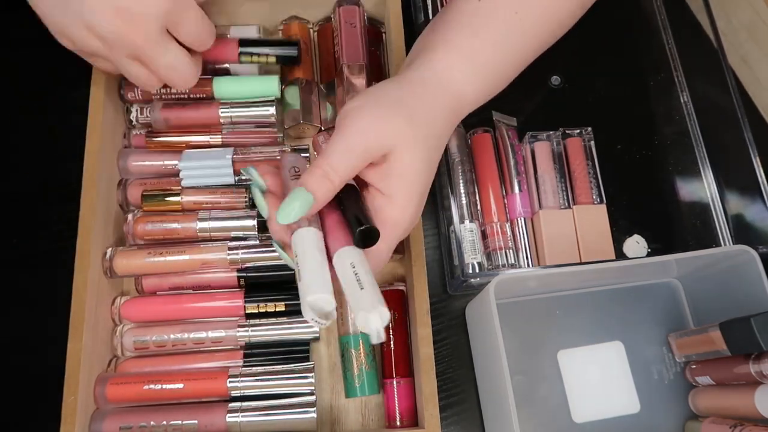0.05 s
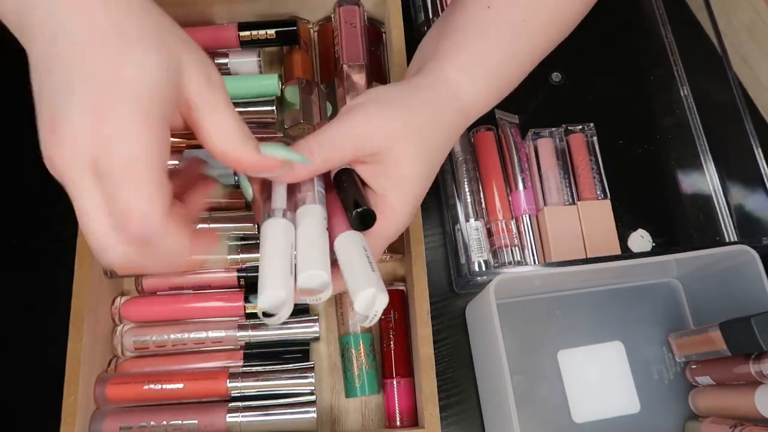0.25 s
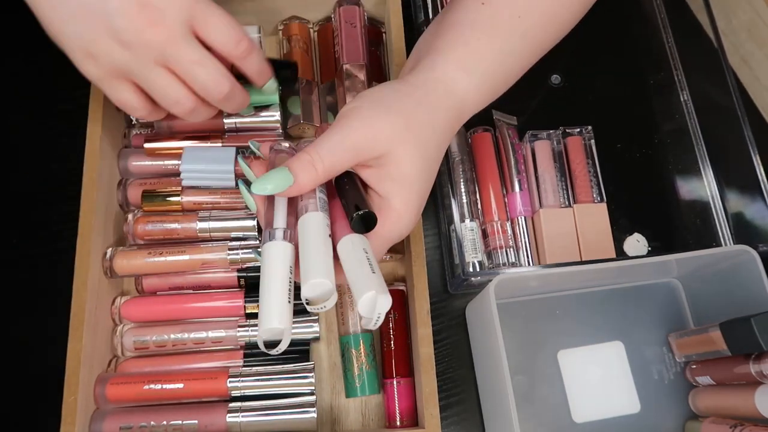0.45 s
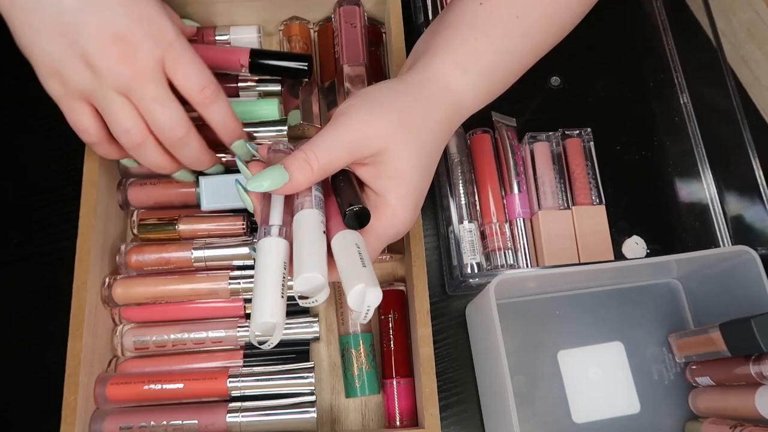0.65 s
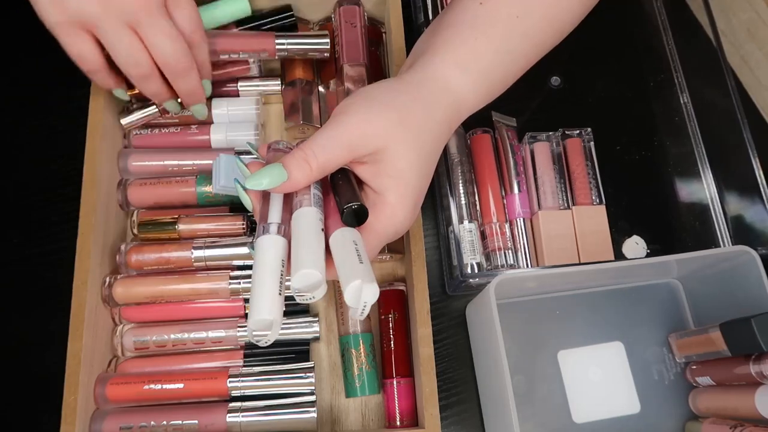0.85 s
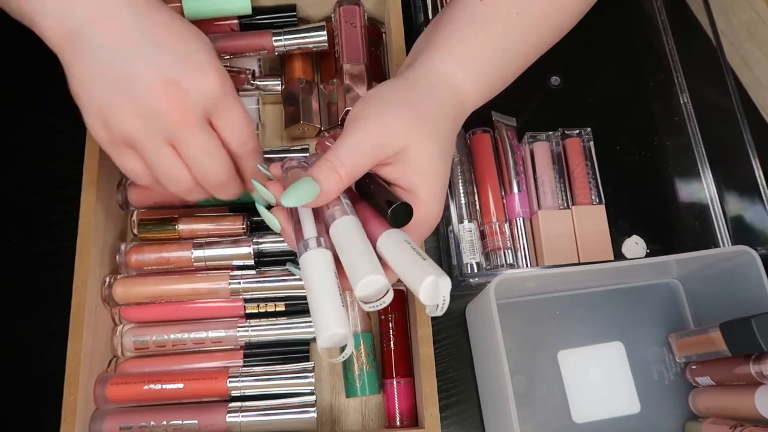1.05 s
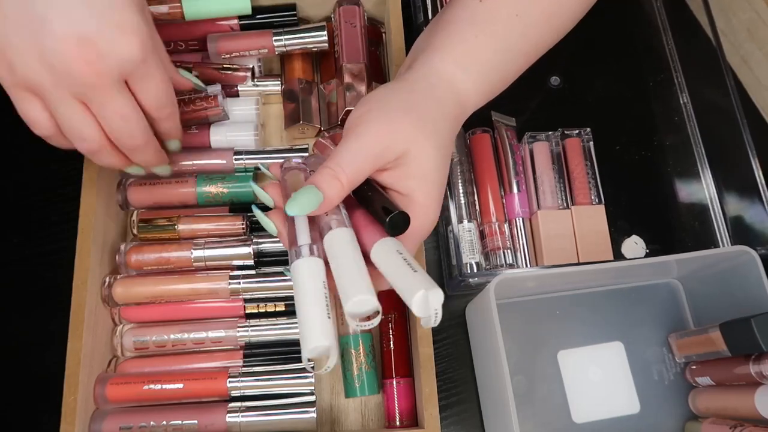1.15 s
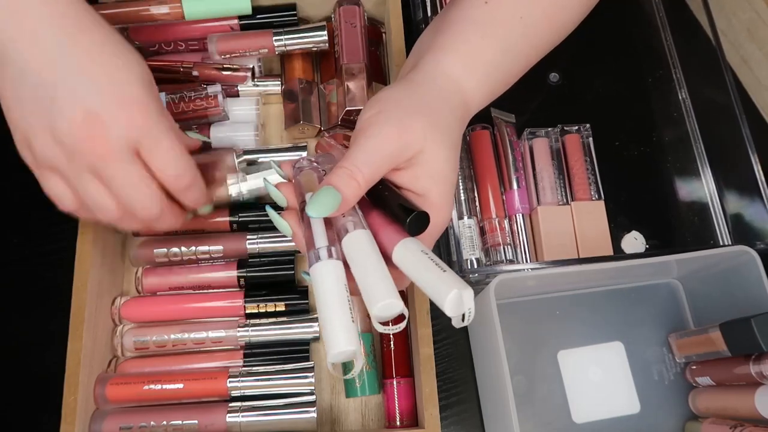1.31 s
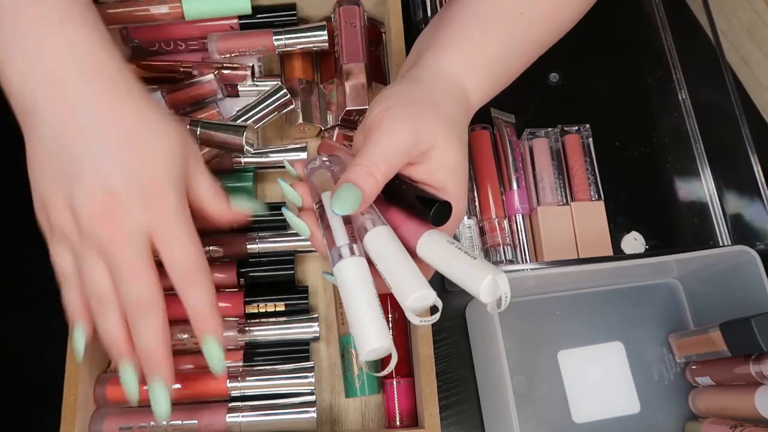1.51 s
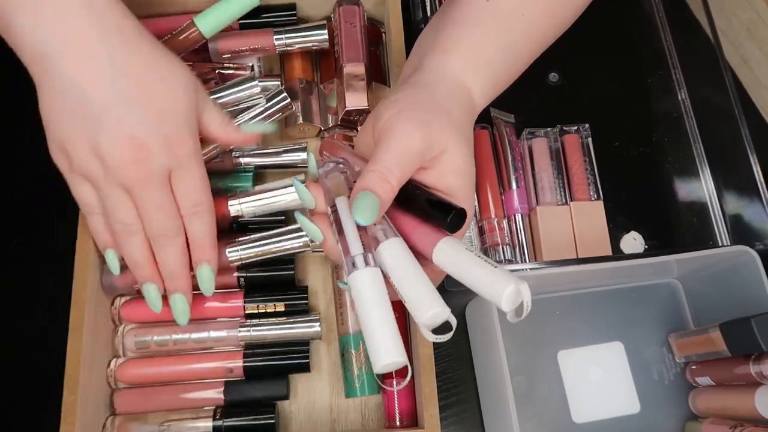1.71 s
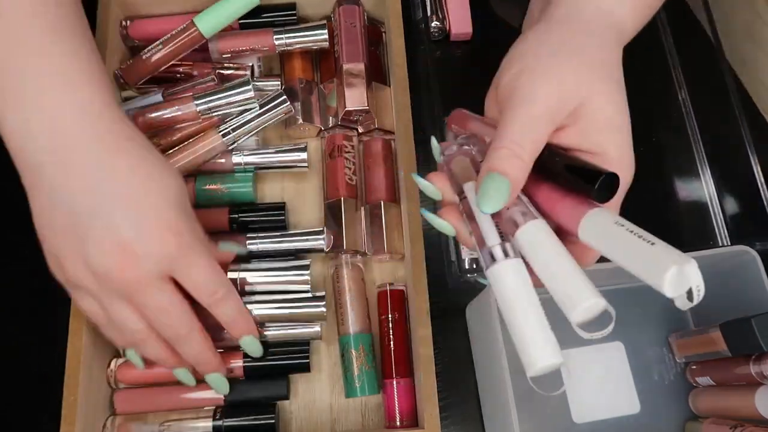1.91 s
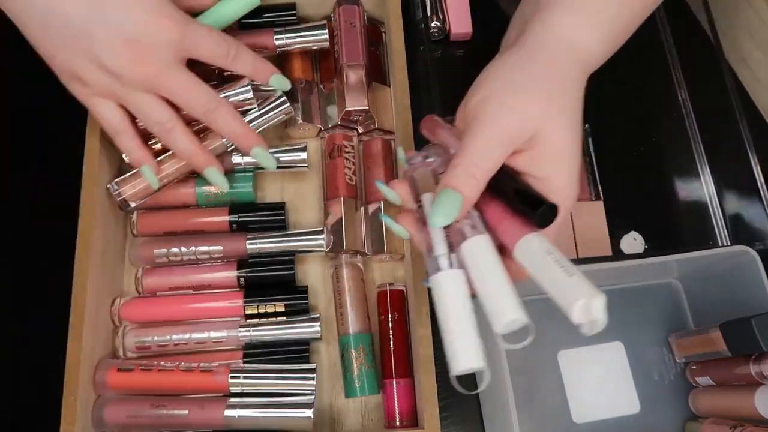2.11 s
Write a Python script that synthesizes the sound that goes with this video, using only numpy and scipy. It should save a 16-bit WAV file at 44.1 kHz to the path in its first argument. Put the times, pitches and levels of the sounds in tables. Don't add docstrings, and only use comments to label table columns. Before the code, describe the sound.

Hard plastic tubes click and clatter as hands rummage in a wooden drawer, heard close in mono. Lighter, scattered clicks come first, thickening from 0.55 to 0.9 seconds. After a lull come strong clacks around 1.1 and 1.3, dense rattling at 1.55-1.7 and 1.82-2.0, then a few softer clicks near 2.15. Faint rustling, short room reflections and a steady low hum lie underneath.

```python
import sys
import numpy as np
from scipy import signal
from scipy.fft import rfft, irfft
from scipy.io import wavfile
from scipy.ndimage import uniform_filter1d

SR = 44100
rng = np.random.default_rng(int(sys.argv[2]) if len(sys.argv) > 2 else 0)


def boost(x):
    u = np.asarray(x, float) / 20
    return 10 ** u


def inscribe(sig):
    pcm = np.round(np.clip(np.atleast_2d(sig).T, -1, 1) * 32767)
    wavfile.write(sys.argv[1], SR, pcm.astype(np.int16))


N = 95608

CLACK_TIME = np.arange(1200) / SR
CAP_LOW_HZ = 8000


def unit(x):
    return x / np.sqrt(np.mean(x ** 2))


def band(x, low_hz, high_hz):
    return signal.sosfilt(signal.butter(2, [low_hz, high_hz], "band", fs=SR, output="sos"), x)


def ring(mode_hz, mode_db, t60_s):
    modes = boost(mode_db)[:, None] * np.sin(2 * np.pi * mode_hz[:, None] * CLACK_TIME)
    x = modes.sum(0) * 1000. ** (-CLACK_TIME / t60_s)
    return x / np.sqrt(np.mean(x[:176] ** 2))


def tubes():
    # (time [s], tube level [dB], board level re tube [dB], cap level re tube [dB],
    # pitch [Hz])
    main_impacts = [(0.0296, -34.5, -5, 0, 5980), (0.041, -24.5, -3.5, -3.5, 4500),
                    (0.1063, -29.5, -2, -9, 4440), (0.1503, -33, -21, 8.5, 5280),
                    (0.2039, -54, -12, 11.5, 14130), (0.226, -38, -7.5, -12, 3970),
                    (0.278, -41, -5.5, -12, 3940), (0.333, -46, -3, -1, 13670), (0.3389, -39.5, -25, 2.5, 1960),
                    (0.403, -34.5, 2.5, -6.5, 3380), (0.4349, -32, 2.5, -1, 4330), (0.4446, -36, 0, 0, 8940),
                    (0.4594, -31, -6, -1, 11400), (0.4644, -30.5, -1, 0, 4020), (0.483, -34, -2.5, -12, 5340),
                    (0.5411, -30.5, 0, -2.5, 4500), (0.5513, -27.5, 1, -12, 5200), (0.5877, -34, -14, -11, 6080),
                    (0.5948, -19.5, 0, 3.5, 12100), (0.6398, -33, 9, -7, 5460), (0.6589, -24, 2, -3.5, 4030),
                    (0.6733, -30, 7.5, -13, 3400),
                    (0.7082, -23, 0, -4, 5320), (0.7214, -23.5, 3, 3, 13480), (0.7277, -17, -8.5, -5.5, 5190),
               (0.7502, -25, 0.5, 0.5, 6860), (0.7676, -31.5, 4.5, 1, 5360), (0.7762, -20, -7, -5, 4020),
               (0.8126, -18, -4, -1.5, 4580), (0.826, -20, -7, -23, 7060), (0.839, -17.5, -4.5, -5, 6950),
               (0.863, -27, -10, -7, 4530), (0.882, -25, -2, -18, 5500), (0.8889, -19.5, -9.5, -3, 4100),
               (0.9469, -33.5, -3.5, -13, 5160), (0.968, -38.5, 11.5, -2, 4120),
               (0.9814, -40.5, 11.5, -1, 4460), (1.0077, -37.5, -2, 3.5, 14400),
               (1.047, -27.5, 1, -2.5, 4250), (1.1006, -22, -3, -7, 5340), (1.1085, -22.5, 0, -6.5, 6600),
               (1.1138, -18, -7.5, -8.5, 4520), (1.203, -52, 11, 7, 14400),
                    (1.2305, -30, -2, -5, 3570), (1.2588, -22, -5, -17, 4200), (1.2694, -22.5, -1.5, 0.5, 4000),
                (1.2939, -13.5, 1.5, -27, 4420), (1.298, -20.5, -24, 2, 4400),
                (1.308, -13.5, -4, -6.5, 4150), (1.3902, -36.5, 3.5, 1.5, 4090), (1.4445, -40, 0, -5, 5570),
                (1.5352, -32, -0.5, -5.5, 3380), (1.563, -18.5, -6.5, -13, 5010),
                (1.5764, -16.5, -1, 1, 9500), (1.5853, -18, -2.5, -8, 5400), (1.6079, -18.5, -6, -1, 5000),
                (1.6296, -19, -8.5, 1, 5680), (1.6403, -22.5, 4.5, -7, 5920), (1.6464, -18, -2, -8, 5020),
                (1.6566, -18.5, -12, -2, 12600), (1.6612, -15, -7, -4, 6140),
                (1.6666, -15.5, -3, -13.5, 4260), (1.676, -26, -17, -10, 7060),
                (1.6898, -15.5, -7, -3.5, 4110), (1.7022, -24.5, -6.5, -22, 6590),
                    (1.7308, -28.5, -5.5, -9.5, 5280), (1.8214, -33.5, 1, -17, 3640),
               (1.8315, -23, -7, -18, 3800), (1.8439, -22, -3.5, -16, 6160), (1.8543, -18, -7, -0.5, 4100),
               (1.8745, -19, -3.5, 0, 4940), (1.8934, -25, -15, -2, 7800), (1.9019, -25, -5, -2, 8660),
               (1.9175, -20, 2.5, -0.5, 4070), (1.952, -27, 4.5, 6, 10800),
               (1.9552, -18.5, -1, -2.5, 14400), (1.9739, -25, -1, -6, 5640), (1.9792, -22, -4, -5, 4520),
               (1.985, -17.5, -5.5, -9.5, 5520), (1.9929, -16.5, -5, -9, 4990), (2.007, -23, -7, -12, 4730),
               (2.1135, -35.5, -11, -12, 6870), (2.1559, -31.5, -10, -11, 3350),
               (2.1598, -25, -4.5, -8, 5100), (2.166, -34, -6, 4, 13500)]
    # (time [s], tube level [dB], board level re tube [dB], cap level re tube
    # [dB], pitch [Hz])
    soft_impacts = [(0.011, -35, -5, -10, 5240), (0.0509, -28, 0, -9, 4440), (0.18, -49.5, -19, 4, 13470),
                    (0.3183, -51, -13, -17, 4350), (0.384, -41.5, 0, -0.5, 4300), (0.3921, -49, 7, -7, 3330),
                    (0.4093, -35.5, 0, -5, 3350), (0.5088, -51, 3, -9, 4350), (0.5228, -41, 0, -4, 4150),
                    (0.535, -35.5, 2.5, -10, 4970), (0.5605, -28, -1, -6, 4440), (0.5658, -38, -1, 5, 3000),
                    (0.5745, -45, 1, -1, 4270), (0.5851, -25.5, -6, -19, 4200), (0.632, -34, -9, -5, 5200),
                    (0.6642, -19, -12, -4, 4300), (0.7142, -30.5, 8.5, 3, 3840), (0.7299, -19.5, -4, -3, 5340),
                    (0.816, -21.5, 0, -18, 4380), (1.0257, -41, -1, -2, 4200), (1.0837, -52, 5, -17, 3280),
                    (1.1648, -45, -3, -15, 4000),
                    (1.328, -25.5, -22, -3.5, 5100), (1.3424, -32.5, -14, -2, 4260),
                (1.3535, -32, -2, -17, 5700), (1.3713, -34.5, -5, -16, 4500), (1.4027, -32, 0.5, -5, 4500),
                (1.4112, -38, -1, -1, 3450), (1.4681, -46.5, 6.5, -16, 3490),
                (1.4817, -49.5, 3.5, -17, 3980), (1.5129, -60, 13, -15, 3660), (1.5321, -35, -12, -2, 3100),
                (1.5486, -30, -1, -11, 4860), (1.5967, -34, -15, -1, 5200), (1.6097, -19, -2, 2.5, 5440),
                (1.6475, -21, 3.5, 5.5, 2970), (1.7268, -39, 0, -14, 6140), (1.7926, -47.5, 3, -20, 3480),
                (1.9087, -34, -8, -3, 5700), (1.923, -25.5, -7, 2.5, 3980), (2.0176, -32.5, 1.5, -2, 3950),
                (2.0277, -31, 3, -11, 4760), (2.1312, -36.5, -3, -9, 4930), (2.1422, -40, -4, -1, 4700),
                (2.1507, -42, -1, 9.5, 3450)]
    out = np.zeros(N + SR)
    for time_s, *impact in main_impacts + soft_impacts:
        sound, start = clack(*impact), int(time_s * SR)
        out[start:start + len(sound)] += sound
    return out[:N]


def clack(tube_db, board_db, cap_db, pitch_hz):
    # (frequency [Hz], level [dB])
    drawer_modes = [(450, -14.5), (880, -16.5), (1040, -2), (1330, 1), (1570, 3.5), (1900, -1), (2300, 1.5)]
    u = rng.random((3, 8))
    g = rng.standard_normal((2, 8))
    hiss = rng.standard_normal((2, len(CLACK_TIME)))

    board_hz, board_mode_db = np.transpose(drawer_modes)
    board = ring(board_hz * (1 + 0.045 * g[1, :7]), board_mode_db + 5 * g[0, 1:], t60_s=0.025)

    centre_hz, spread = np.clip(pitch_hz, 3700, 6300), 1.42
    tube_hz = centre_hz * spread ** (2 * u[0] - 1)
    cap_hz = CAP_LOW_HZ * 1.9 ** u[1]
    side_db = -11 + 4 * g[1]
    tube_mode_db, cap_mode_db = side_db, side_db
    if pitch_hz > CAP_LOW_HZ:
        cap_hz, cap_mode_db = np.r_[pitch_hz, cap_hz], np.r_[0, side_db]
    else:
        tube_hz, tube_mode_db = np.r_[pitch_hz, tube_hz], np.r_[0, side_db]
    tube = ring(tube_hz, tube_mode_db, t60_s=0.016)
    cap = ring(cap_hz, cap_mode_db, t60_s=0.0056)

    crack = contact_noise(u[2], g[1], hiss)
    parts = [(board_db - 2.5, board, 900, 2800),
             (tube_db * 0 - 1, tube, centre_hz / spread, centre_hz * spread),
             (cap_db + 0.5, cap, CAP_LOW_HZ, 13500)]
    body = 0
    for level_db, modes, low_hz, high_hz in parts:
        noise = band(crack, low_hz, high_hz) * np.sqrt(SR / 2 / (high_hz - low_hz))
        body = body + boost(level_db) * (modes + noise)
    contact_s = 0.0001
    return boost(tube_db) * body * np.minimum(CLACK_TIME / contact_s, 1)


def contact_noise(gaps, strengths, hiss):
    crack_s, chatter_s, chatter_db = 0.00088, 0.0055, -6
    snap = np.exp(-CLACK_TIME / crack_s)
    late = (np.cumsum(gaps) * chatter_s * SR / 2).astype(int)
    strength = boost(chatter_db + 3.7 * strengths) * np.exp(-late / SR / chatter_s)
    rebounds = np.bincount(late, strength, len(CLACK_TIME))
    chatter = np.convolve(rebounds, snap)[:len(CLACK_TIME)]
    return hiss[0] * snap + hiss[1] * chatter


def rummage(clacks):
    # (time [s], level [dB])
    finger_effort = [(0, -39), (.08, -66.5), (.3, -70.5), (0.418, -57.5), (.5, -63.5), (0.558, -46.5),
                     (.9, -52.5), (1.04, -64), (1.19, -67), (1.337, -43.5), (1.501, -79), (1.6, -42.5),
                     (1.71, -45.5), (1.769, -68.5), (1.82, -59), (1.88, -41.5), (2.032, -52),
                     (2.078, -69.5), (2.16, -57)]
    # (frequency [Hz], level [dB])
    heap_modes = [(520, 1), (1000, 4), (1450, 2), (2200, 5), (3100, 4.5), (4200, 3), (5600, 7), (7500, 2.5),
                  (9800, 4.5), (13400, -7.5)]
    ticks_per_s, tick_scatter_db, tick_colour_db = 700, 2, 3
    rattle_s, rattle_db, rustle_db = 0.013, -11, -3

    times, levels = np.transpose(finger_effort)
    effort = boost(np.interp(np.arange(N) / SR, times, levels))
    u, span = rng.random((2, N)), int(rattle_s * SR)
    ticks = (u[0] < ticks_per_s / SR) * boost(-tick_scatter_db * np.log(u[1] + 1e-3))
    out = 0
    for hz, db in heap_modes:
        colour, slide = rng.standard_normal((2, N))
        edges = hz / 1.17, hz * 1.17
        power = uniform_filter1d(band(clacks, *edges) ** 2, size=span, origin=span // 3)
        shaken = np.sqrt(np.abs(power))
        tick = unit(band(ticks * boost(tick_colour_db * colour), *edges))
        rustle = unit(band(slide, *edges))
        out = out + (boost(db) * effort / 2 + boost(rattle_db) * shaken) * tick
        out = out + boost(db + rustle_db) * effort / 2 * rustle
    return out


def room(x):
    t = np.arange(SR // 3) / SR
    build_s, tail_db = 0.003, -12.5
    noise = rng.standard_normal(len(t)) * np.minimum(t / build_s, 1)
    low = band(noise, 300, 7000) * 1000. ** (-t / 0.099)
    high = band(noise, 7000, 15000) * 1000. ** (-t / 0.098)
    tail = low + boost(-5) * high
    return x + boost(tail_db) * signal.fftconvolve(x, tail / np.sqrt(np.sum(tail ** 2)))[:N]


def background():
    # (frequency [Hz], level per Hz [dB])
    air_spectrum = [(20, 14), (60, 6.5), (140, -3), (320, -5), (700, -15), (4000, -64), (16000, -80)]
    air_db, hum_hz, hum_db = -43.5, 180.2, -36
    f = np.arange(1, N // 2 + 2) * SR / N
    hz, db = np.transpose(air_spectrum)
    shape = boost(np.interp(np.log(f), np.log(hz), db))
    air = irfft(rfft(rng.standard_normal(N)) * shape, N)
    waver = unit(uniform_filter1d(rng.standard_normal(N), size=6000))
    phase = 2 * np.pi * hum_hz * np.arange(N) / SR + 0.12 * waver
    hum = np.sqrt(2) * np.sin(phase)
    return boost(hum_db + 0.8 * waver[::-1]) * hum + boost(air_db) * unit(air)


def scene():
    clacks = tubes()
    return (room(clacks + rummage(clacks)) + background())[None]


def band_limit(x):
    return signal.sosfilt(signal.butter(12, 16670, fs=SR, output="sos"), x)


def record(dry):
    rounded = np.tanh(0.84 * dry) / 0.62
    top_cut = signal.ellip(8, .2, 70, 15900, fs=SR, output="sos")
    mix = signal.sosfilt(top_cut, rounded)
    return band_limit(mix)


dry = scene()
out = record(dry)
inscribe(out)
```